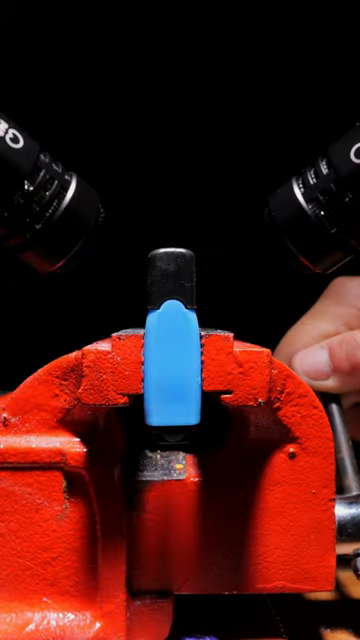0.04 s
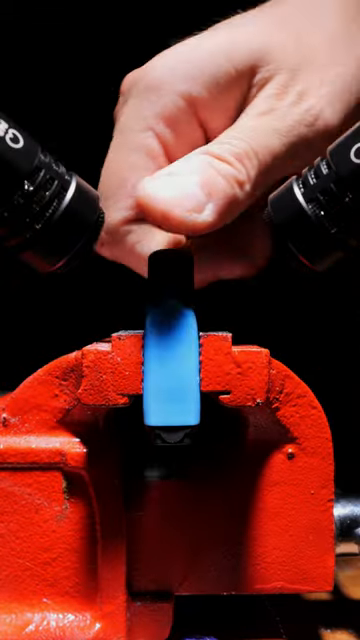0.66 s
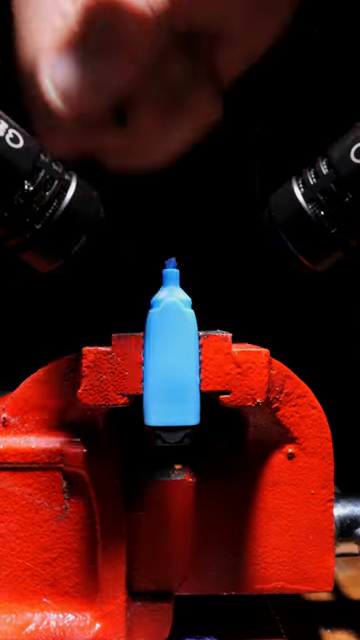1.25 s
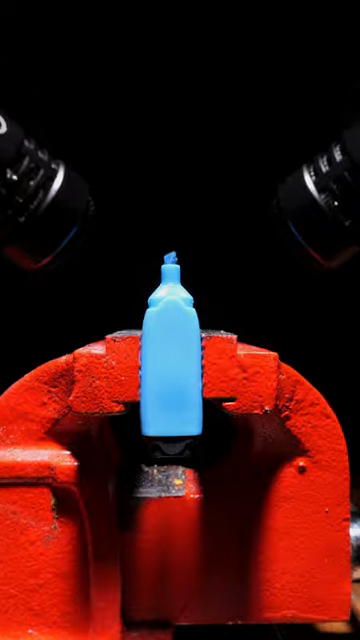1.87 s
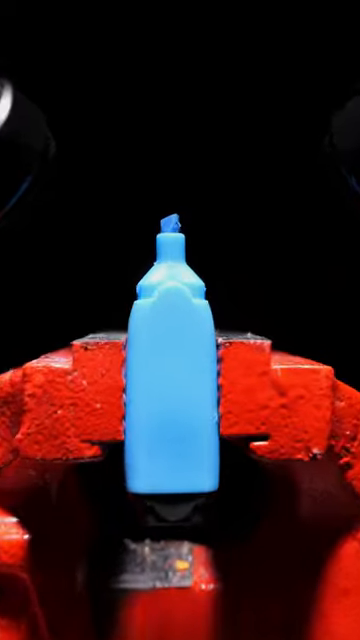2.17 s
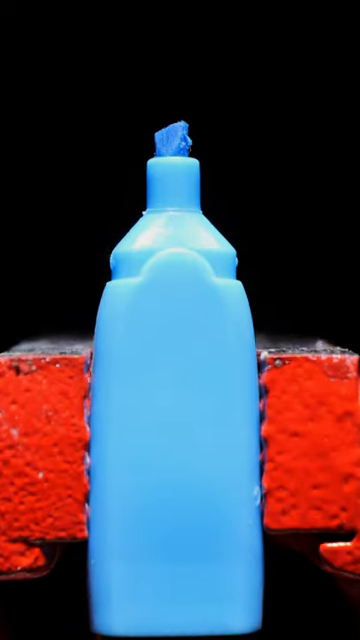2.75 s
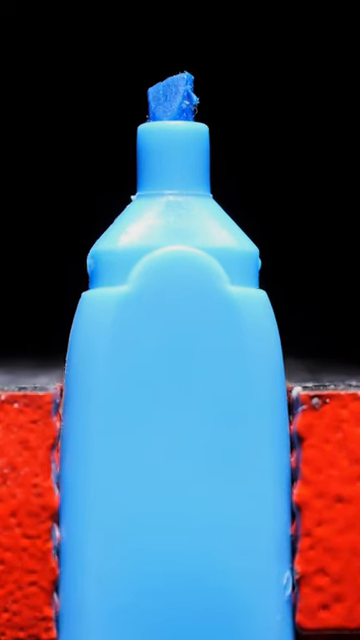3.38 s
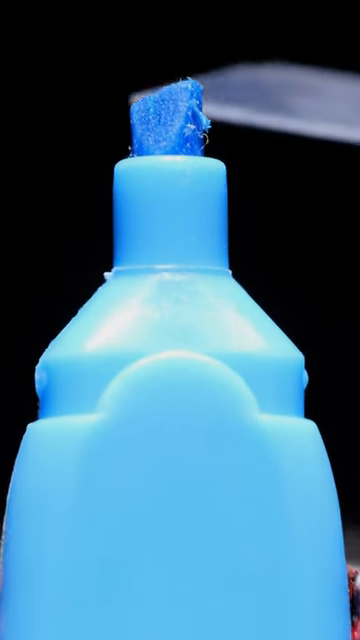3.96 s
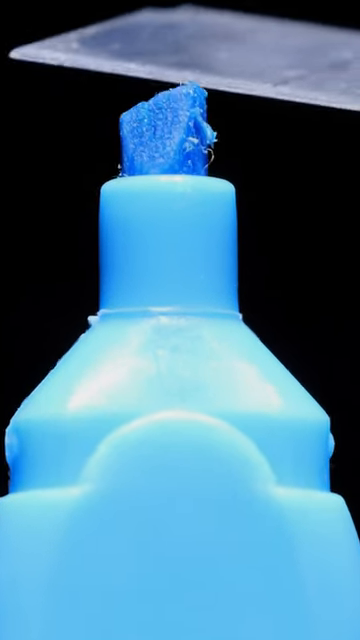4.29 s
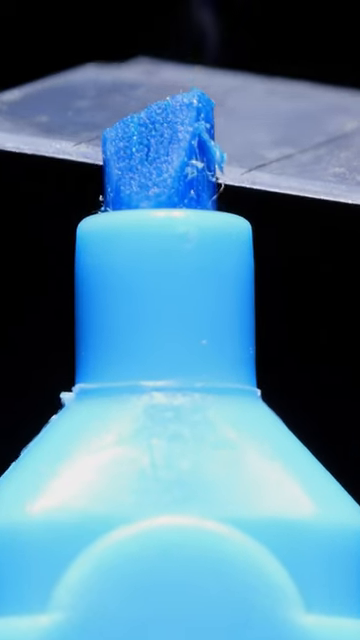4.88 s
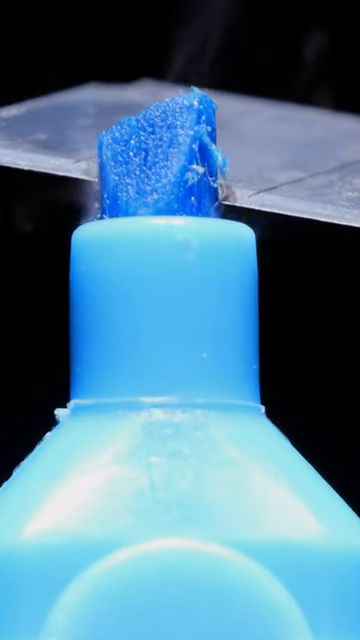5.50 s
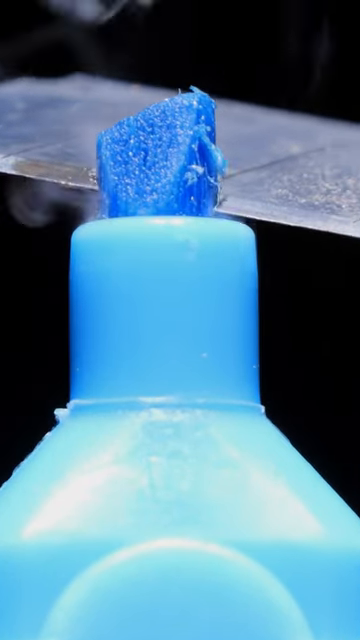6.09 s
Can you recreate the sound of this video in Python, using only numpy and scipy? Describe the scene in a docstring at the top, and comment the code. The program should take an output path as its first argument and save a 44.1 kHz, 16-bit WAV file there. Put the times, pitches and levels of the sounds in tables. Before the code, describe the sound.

Close sharp vise clicks, a plastic cap snapping off, faint bumps, a swelling hiss, then wet ink sizzling and crackling on a hot blade.

```python
"""Sharp clicks and dull knocks, very close: a bench vise tightens on a plastic highlighter.
Fingers slide on the cap, which scrapes over its ridges and snaps off, thumping the bench.
The rig rumbles and bumps as it moves in, and a rush of hiss swells as a hot blade arrives.
The blade sinks into the wet felt tip: tiny ink bubbles burst in a sizzle and larger ones spit."""
import sys
import numpy as np
from scipy import signal
from scipy.fft import rfft, irfft, next_fast_len
from scipy.io import wavfile
from scipy.ndimage import uniform_filter1d

SR = 44100
rng = np.random.default_rng(int(sys.argv[2]) if len(sys.argv) > 2 else 0)


def file_out(sig):
    """Save sig as 16-bit WAV at sys.argv[1]."""
    # one column per channel
    cols = np.atleast_2d(sig).T
    # limit, then scale
    lim = np.clip(cols, -1, 1)
    pcm = np.round(lim * 32767).astype(np.int16)
    wavfile.write(sys.argv[1], SR, pcm)


N = 270774
TIME = np.arange(N) / SR
FFT_SIZE = next_fast_len(N + SR)
BIN_HZ = np.maximum(np.arange(FFT_SIZE // 2 + 1) * SR / FFT_SIZE, 1)
REPEAT_S, RUSH_CREST_S = 0.02086, 4.0846

# clicks of the tightening vise: start_s, peak_db, lowpass_hz, t60_s
VISE_CLICKS = [(0.0209, -15.5, 9100, 0.012), (0.0307, -13.5, 4440, 0.005), (0.057, -16.5, 10300, .0045),
               (0.0636, -20, 11000, 0.0045), (0.0837, -13, 4350, 0.0088), (0.2008, -19, 5300, 0.009),
               (0.3802, -37.5, 1420, .022)]
# tone of the vise: freq_hz, gain_db
VISE_COLOUR = [(200, -16.5), (800, -18), (1300, -7.5), (2100, 2), (2800, 2.5), (4000, -1.5), (5500, -6.5),
               (7800, -12), (9800, -6), (12500, -27.5), (16000, -32)]
# faint bright ticks of the screw thread: start_s, peak_db
THREAD_TICKS = [(0.021, -28.5), (0.057, -36), (0.0635, -38), (0.1665, -53), (0.1988, -36.5),
                (0.3295, -54.5), (0.381, -43)]
# dull knocks of vise and hand: start_s, peak_db, lowpass_hz, t60_s, repeat_gain
KNOCKS = [(0.02, -40, 900, 0.046, 1), (0.0879, -36, 900, 0.013, 0.1), (0.0963, -27.5, 1192, 0.013, .75),
          (0.2012, -25.5, 1560, 0.014, 0.72), (0.2288, -32, 1010, 0.021, 0.3),
          (0.38, -32.5, 1900, 0.033, 0.7), (1.4172, -53, 450, 0.087, 0.1), (1.4385, -49.5, 720, 0.088, 0),
          (1.538, -60.5, 699, 0.04, 0.02), (2.946, -43.5, 496, 0.057, 0.1), (3.2416, -43, 950, 0.029, 0.18),
          (3.464, -54, 1210, 0.058, 0)]
# tone of a knock: freq_hz, gain_db
KNOCK_COLOUR = [(60, -19), (150, -4.5), (380, -3), (600, 3), (850, -7.5), (1400, 0), (2500, -31),
                (8000, -60.5)]
# small scuffs of hand and cap: start_s, peak_db, pitch_hz, t60_s
SCUFFS = [(0.755, -63, 1597, 0.03), (1.437, -53, 1840, 0.28), (1.54, -62, 2200, 0.087),
          (2.447, -51, 2000, 0.19), (2.447, -49, 5070, 0.13), (2.939, -54.5, 1750, 0.11)]

# pushes on the vise and the rig: centre_s, width_s, strength_db
PUSHES = [(0.9, .04, -70), (1.46, 0.086, -58), (1.71, .015, -71.5), (2.125, 0.068, -52), (2.3, .1, -56),
          (2.455, 0.073, -50), (2.81, 0.036, -58.5), (2.98, 0.057, -54), (3.19, .04, -75),
          (3.31, 0.032, -55), (4.02, 0.027, -62), (4.29, 0.024, -61), (4.65, 0.21, -69.5)]
# brief rubs of skin and gear: centre_s, width_s, level_db
RUBS = [(0.987, 0.026, -55.5), (2.46, 0.014, -57), (2.94, 0.085, -69), (3.365, 0.0096, -63),
        (3.47, 0.0082, -58.5)]
# bright tone of a rub: freq_hz, gain_db
RUB_COLOUR = [(500, -32), (1300, -15), (2200, 2), (3300, -1.5), (5000, 3.5), (7800, 3.5), (9500, 11.5),
              (12000, -3), (16000, -12)]
# sub-bass sway of the rig: freq_hz, gain_db
SWAY_COLOUR = [(8, -2), (18, 10.5), (45, -5), (70, -24), (140, -49.5)]
# low rumble: freq_hz, gain_db
RUMBLE_COLOUR = [(30, -8.5), (65, 0.5), (120, 4), (170, 1), (230, -11), (450, -15), (700, -34.5),
                 (2000, -40.5)]
# hiss of the rig and the background: freq_hz, gain_db
HISS_COLOUR = [(200, 2.5), (500, 5.5), (800, 2), (1400, 5), (2200, 5), (3300, -5), (4600, 1), (6500, -8.5),
               (8000, -7), (9800, 4.5), (12000, -4.5), (13200, -10.5), (14500, -5), (16000, -22.5)]

# the cap slipping over its ridges: start_s, peak_db, t60_s
CAP_SLIPS = [(1.2065, -29.5, 0.015), (1.2111, -21, 0.024), (1.2165, -27.5, 0.0099), (1.2186, -21.5, .008),
             (1.2228, -23.5, 0.025), (1.2358, -18.5, .006), (1.2406, -12, .009)]
# tone of a slip: freq_hz, gain_db
SLIP_COLOUR = [(300, 6.5), (1200, -8.5), (1650, -16.5), (2800, -4.5), (3600, -11), (4600, -1.5),
               (6500, -12.5), (9800, -1.5), (12500, -17), (16000, -24)]
# ringing modes of the cap: pitch_hz, level_db, t60_s
CAP_MODES = [(2060, -8.5, .009), (2480, -6.5, .008), (2782, 1, 0.0092), (3050, -8, .008), (3980, -6, .007),
             (4470, 1.5, 0.011), (4950, -7, 0.0085), (5660, -10, 0.011), (6900, -11, .005),
             (8740, -6, .005), (9500, -6, 0.004), (11950, -5, 0.0029)]
# hiss after the snap: freq_hz, gain_db
SNAP_TAIL_COLOUR = [(300, 4.5), (700, -3.5), (1200, -4), (1600, -14), (2200, -4), (2800, 2.5), (3600, -10),
                    (4600, -4), (6000, -7.5), (8000, -10), (10000, -7), (12000, -14), (14000, -32.5)]
# jolts through the bench: start_s, peak_db, lowpass_hz
BENCH_JOLTS = [(1.207, -8, 340), (1.222, -20.5, 210), (2.102, -32, 138.5), (3.2406, -18.2, 65),
               (3.29, -30, 80.8)]
# ringing modes of the bench: pitch_hz, level_db, t60_s
BENCH_MODES = [(52, -1, .1), (72, 0.5, 0.082), (101, -1, 0.068), (124, -2, .07), (182, -6, .065),
               (280, -8, .045), (375, -5, 0.012)]
# slow swings of the microphone stand after the hardest jolts: start_s, pitch_hz, peak_db, t60_s
STAND_SWINGS = [(1.249, 13.5, -10.5, 0.33), (3.272, 24.4, -23, 0.19)]

# swells of the rush's body, edge and top: rise_s, fall_s, crest_db, rise_power, fall_power
RUSH_SWELLS = [(.65, 0.94, -36, 1.44, 1.98), (0.67, .86, -35, 2, 1.6), (0.7, 0.99, -33.5, 1.87, 1.87)]
# midrange body of the rush: freq_hz, gain_db
RUSH_BODY = [(100, -36), (165, -13), (270, -5.5), (400, -21), (750, -12), (1000, -10.5), (1400, -1.5),
             (2200, 3), (2900, -1), (3600, -16.5), (6000, -34), (14000, -50)]
# biting edge of the rush: freq_hz, gain_db
RUSH_EDGE = [(1500, -31.5), (2800, -6), (3500, -1), (4300, 0.5), (5300, -2.5), (6200, -6.5), (8000, -21),
             (14000, -45)]
# airy top of the rush: freq_hz, gain_db
RUSH_TOP = [(2500, -22), (5000, -14), (7200, -3.5), (8100, -5), (9400, 2.5), (10500, -2), (12200, -7.5),
            (13200, -21), (14500, -10.5), (16000, -32)]

# envelope of the ink boiling at the blade: time_s, level_db
BOIL_ENVELOPE = [(4.7, -51.5), (4.856, -40), (5.012, -37.5), (5.208, -36.5), (5.606, -35.5), (6.03, -37.5),
                 (6.14, -38)]
# crisp tone of the sizzle, also used for the thread ticks: freq_hz, gain_db
SIZZLE_COLOUR = [(150, -47.5), (350, -30), (700, -21), (1500, -13), (2400, -9), (3400, -13), (5000, -5),
                 (6100, -10), (7300, -2.5), (8100, -4.5), (9900, 4), (12000, -3.5), (13200, -6.5),
                 (14500, -6.5), (16000, -21.5)]
# one faint tick as the blade nears, then the loud spits of boiling ink: start_s, peak_db
TICK_AND_SPITS = [(3.4642, -44), (4.8397, -15), (4.8418, -24), (5.0958, -15.5), (5.1657, -18),
                  (5.3888, -8.5), (5.4771, -14), (5.4912, -11), (5.529, -15), (5.547, -15), (5.6948, -15.5),
                  (5.7536, -11.5), (5.7613, -12), (5.7882, -14.5), (5.8815, -6.5), (6.0366, -16)]
# tone of that tick and of the spits: freq_hz, gain_db
SPIT_COLOUR = [(80, -50), (200, -32), (700, -23.5), (1500, -12.5), (2400, -10.5), (3500, -13), (5000, -7.5),
               (6100, -11), (7300, -8.5), (9900, 1.5), (12000, -7.5), (13200, -8), (16000, -14)]

# stereo width of the noise layers and the fizz: freq_hz, side_over_mid_db
STEREO_WIDTH = [(60, -30), (200, -16), (400, -10), (700, -3.5), (1300, -10.5), (2400, -53.5), (8000, -20.5),
                (15000, -71.5)]
# workshop reverb decay (the negative last point only steepens the treble slope): freq_hz, t60_s
ROOM_T60 = [(100, 0.23), (600, 0.35), (1500, 0.56), (4000, 0.74), (7000, 1), (15000, -0.17)]
# tone of the reverb: freq_hz, gain_db
ROOM_COLOUR = [(100, -5), (550, 3.5), (900, -4), (1800, -2), (3500, -3), (5000, -2), (7000, -9.5),
               (15000, -7)]
# stereo width of the reverb: freq_hz, side_over_mid_db
ROOM_WIDTH = [(100, -7.5), (380, -2), (700, 1), (1300, -2), (2400, -7.5), (4400, -9.5), (8000, -6),
              (15000, -13)]


def from_db(db):
    """Decibels to gain."""
    return 10 ** (np.asarray(db) / 20)


def unit_rms(x):
    """Scale to unit power."""
    return x / np.sqrt(np.mean(x ** 2) + 1e-20)


def at_hz(curve, hz):
    """Read a curve on a log-frequency axis."""
    freq_hz, value = np.transpose(curve)
    return np.interp(np.log(hz), np.log(freq_hz), value)


def butter(x, order, hz, kind="low"):
    """Butterworth filter, low-pass by default."""
    return signal.sosfilt(signal.butter(order, hz, kind, fs=SR, output="sos"), x)


def colour(x, spectrum):
    """Minimum-phase EQ, so attacks have no pre-ring."""
    cepstrum = irfft(np.log(from_db(at_hz(spectrum, BIN_HZ))), FFT_SIZE)
    cepstrum[1:FFT_SIZE // 2] *= 2
    cepstrum[FFT_SIZE // 2 + 1:] = 0
    return irfft(rfft(x, FFT_SIZE) * np.exp(rfft(cepstrum)), FFT_SIZE)[..., :N]


def stereo(mid, side):
    """Left and right from mid and side."""
    return np.array([mid + side, mid - side])


def noise(spectrum):
    """A steady bed of coloured noise at unit power, widest in the low mids."""
    mid, side = rfft(rng.standard_normal((2, FFT_SIZE))) * from_db(at_hz(spectrum, BIN_HZ))
    side = side * from_db(at_hz(STEREO_WIDTH, BIN_HZ))
    return unit_rms(stereo(*irfft([mid, side], FFT_SIZE)[:, :N]))


def drift(rate_hz):
    """A random wobble at unit power."""
    knots = rng.standard_normal(N // 20)
    return unit_rms(np.interp(TIME * rate_hz, np.arange(len(knots)), knots))


def held(start_s, end_s, fade_db_per_s):
    """Full gain between two times, fading away on both sides."""
    outside_s = np.maximum(start_s - TIME, 0) + np.maximum(TIME - end_s, 0)
    return from_db(-fade_db_per_s * outside_s)


def bumps(rows):
    """An envelope of bell-shaped swells."""
    return sum(from_db(db) * np.exp(-0.5 * ((TIME - centre_s) / width_s) ** 2)
               for centre_s, width_s, db in rows)


def response(spectrum):
    """The short answer of a body to one click."""
    return colour(np.ones(1), spectrum)[:SR // 10]


def crack(body, t60_s, grit):
    """A click and its dying burst of grit, heard through a body."""
    burst = grit * rng.standard_normal(len(body)) * from_db(-60 * TIME[:len(body)] / t60_s)
    burst[0] += 1
    return signal.fftconvolve(burst, body)[:len(body)]


def struck(modes, t):
    """A struck body: dying sines of alternating polarity."""
    return sum((-1) ** k * from_db(db - 60 * t / t60_s) * np.sin(2 * np.pi * hz * t)
               for k, (hz, db, t60_s) in enumerate(modes))


def place(track, start_s, sound, peak_db):
    """Drop a sound onto a track at a given peak level."""
    i = int(np.clip(round(start_s * SR), 0, N - 1))
    track[i:i + len(sound)] += (from_db(peak_db) * sound / np.abs(sound).max())[:N - i]


def repeated(x, gain):
    """A sound with one short repeat."""
    lag, out = round(REPEAT_S * SR), x.copy()
    out[..., lag:] += gain * x[..., :-lag]
    return out


def room(x, decay_scale=1.0):
    """Workshop reverb, wet only: a diffuse stereo tail that dies band by band."""
    edges_hz, t, tail = np.geomspace(60, 16000, 12), TIME[:SR], 0
    for low, high in zip(edges_hz, edges_hz[1:]):
        hz = np.sqrt(low * high)
        mid, side = butter(rng.standard_normal((2, SR)), 2, [low, high], "band")
        band = stereo(mid, from_db(at_hz(ROOM_WIDTH, hz)) * side)
        fall_db = -60 * t / (decay_scale * at_hz(ROOM_T60, hz))
        tail = tail + band * from_db(at_hz(ROOM_COLOUR, hz) + fall_db)
    fade_in = np.minimum(t / 0.0073, 1)
    return signal.fftconvolve(x[None], unit_rms(tail * fade_in) / np.sqrt(SR), axes=1)[:, :N]


def vise_clicks():
    """The screw slips in sharp steps and its thread ticks, each heard twice."""
    clicks, body, tick_body = np.zeros(N), response(VISE_COLOUR), response(SIZZLE_COLOUR)
    for start_s, peak_db, lowpass_hz, t60_s in VISE_CLICKS:
        place(clicks, start_s, butter(crack(body, t60_s, grit=0.36), 4, lowpass_hz), peak_db)
    for start_s, peak_db in THREAD_TICKS:
        place(clicks, start_s, crack(tick_body, t60_s=0.0045, grit=0.37), peak_db)
    reverb = from_db(-13.5) * room(clicks)
    # the vise still rings from the turn before
    ring = from_db(-54 - 83.5 * TIME) * (noise(VISE_COLOUR) + from_db(-0.5) * noise(KNOCK_COLOUR))
    return repeated(clicks, gain=0.73) + reverb + ring


def knocks():
    """Blunt contacts on the heavy casting and the bench."""
    hits, body = np.zeros(N), response(KNOCK_COLOUR)
    for start_s, peak_db, lowpass_hz, t60_s, repeat_gain in KNOCKS:
        knock = butter(crack(body, t60_s, grit=0.1), 2, lowpass_hz)
        place(hits, start_s, repeated(knock, repeat_gain), peak_db)
    return hits + from_db(-13) * room(hits)


def scuffs():
    """Hand and cap scrape briefly: friction noise in one broad resonance."""
    scrapes, t = np.zeros(N), TIME[:SR // 4]
    for start_s, peak_db, pitch_hz, t60_s in SCUFFS:
        friction = butter(rng.standard_normal(len(t)), 2, [pitch_hz / 1.34, pitch_hz * 1.22], "band")
        place(scrapes, start_s, friction * from_db(-60 * t / t60_s), peak_db)
    return scrapes


def rig_handling():
    """The rig rumbles, sways and hisses as it is pushed and glides in; skin and gear rub briefly."""
    push = bumps(PUSHES)
    glide = held(start_s=1.68, end_s=3.44, fade_db_per_s=110)
    handled = held(start_s=0.91, end_s=4.9, fade_db_per_s=20)
    smeared_push = uniform_filter1d(push, int(0.18 * SR))   # the deep sway spreads around each push
    sway_gain = from_db(2.5) * smeared_push + from_db(-61.5) * glide + from_db(-72) * handled
    sway = sway_gain * noise(SWAY_COLOUR)
    rumble = from_db(-1) * np.hypot(push, from_db(-72.5) * glide) * noise(RUMBLE_COLOUR)
    hiss = (from_db(-71.5) * glide + from_db(-33.5) * push) * noise(HISS_COLOUR)
    rubs = bumps(RUBS) * noise(RUB_COLOUR)
    return sway + rumble + hiss + rubs


def cap_pull(snap_s=1.2407, tail_hold_s=0.073):
    """The cap scrapes over its ridges and rings as it snaps free, trailing hiss and rumble."""
    clicks, body = np.zeros(N), response(SLIP_COLOUR)
    for start_s, peak_db, t60_s in CAP_SLIPS:
        place(clicks, start_s, crack(body, t60_s, grit=0.92), peak_db)
    place(clicks, snap_s, struck(CAP_MODES, TIME[:SR // 10]), peak_db=-5)
    sliding = held(CAP_SLIPS[0][0], CAP_SLIPS[-1][0], fade_db_per_s=1701.5)
    slide = from_db(-46.5) * sliding * noise(SLIP_COLOUR)
    reverb = from_db(-25) * room(clicks, decay_scale=0.45)
    tail_gain = from_db(-49) * (TIME > snap_s) * held(snap_s, snap_s + tail_hold_s, fade_db_per_s=254)
    tail = tail_gain * (noise(SNAP_TAIL_COLOUR) + from_db(7.5) * noise(RUMBLE_COLOUR))
    return clicks + slide + reverb + tail


def bench_thumps():
    """Jolts ring the bench's low modes; the stand swings slowly after the hardest ones."""
    thumps, t = np.zeros(N), TIME[:SR // 2]
    bench = struck(BENCH_MODES, t)
    for start_s, peak_db, lowpass_hz in BENCH_JOLTS:
        place(thumps, start_s, butter(bench, 2, lowpass_hz), peak_db)
    for start_s, pitch_hz, peak_db, t60_s in STAND_SWINGS:
        attack = 1 - np.exp(-t * pitch_hz / 0.066)
        place(thumps, start_s, struck([(pitch_hz, 0, t60_s)], t) * attack, peak_db)
    return thumps + from_db(-16) * room(thumps)


def rush_swell(rise_s, fall_s, crest_db, rise_power, fall_power):
    """An envelope that climbs to the crest of the rush and falls back to silence."""
    rise = np.clip(1 + (TIME - RUSH_CREST_S) / rise_s, 0, 1)
    fall = np.clip(1 - (TIME - RUSH_CREST_S) / fall_s, 0, 1)
    return from_db(crest_db) * rise ** rise_power * fall ** fall_power


def blade_rush(repeat_gain=0.67, surge_width_s=0.021):
    """Hiss swells over a little rumble as the blade arrives; a short repeat turns it slightly hollow."""
    body_gain, edge_gain, top_gain = [rush_swell(*row) for row in RUSH_SWELLS]
    body = body_gain * (noise(RUSH_BODY) + from_db(-34) * noise(RUMBLE_COLOUR))
    hiss = body + edge_gain * noise(RUSH_EDGE) + top_gain * noise(RUSH_TOP)
    surge_db = np.exp(-0.5 * ((TIME - RUSH_CREST_S) / surge_width_s) ** 2)   # 1 dB extra at the crest
    flutter_db = 0.6 * drift(rate_hz=150)
    return repeated(hiss * from_db(surge_db + flutter_db), repeat_gain) / np.hypot(1, repeat_gain)


def tick_and_spits(boil, max_per_s=30, over_boil_db=17, spread_db=1.5):
    """A faint tick as the blade nears; then larger bubbles crack, on cue and at random with the boil."""
    cracks, body = np.zeros(N), response(SPIT_COLOUR)
    onsets = np.flatnonzero(rng.random(N) < max_per_s * boil / boil.max() / SR)
    peaks_db = 20 * np.log10(boil[onsets]) + over_boil_db + spread_db * rng.standard_normal(N)[onsets]
    for start_s, peak_db in [*TICK_AND_SPITS, *zip(TIME[onsets], peaks_db)]:
        place(cracks, start_s, crack(body, t60_s=0.0014, grit=0.055), peak_db)
    return cracks


def bubble_pops(per_s, spread_db):
    """Random bubble bursts of uneven size, as a mid and a side click train."""
    popped = rng.random((2, N)) < per_s / SR
    polarity = rng.choice([-1, 1], (2, N))
    size_db = spread_db * np.minimum(rng.exponential(1, (2, N)), 4)
    return popped * polarity * from_db(size_db)


def ink_sizzle():
    """Thousands of tiny ink bubbles burst on the hot steel over a bed of steam; a few spit loudly."""
    time_s, level_db = np.transpose(BOIL_ENVELOPE)
    boil = from_db(np.interp(TIME, time_s, level_db)) * held(time_s[0], time_s[-1], fade_db_per_s=81)
    # each size of bubble sounds in its own band
    edges_hz = [150, 600, 1400, 2800, 5600, 10000, 17000]
    pops = sum(butter(bubble_pops(per_s=2600, spread_db=5), 2, [low, high], "band")
               for low, high in zip(edges_hz, edges_hz[1:]))
    pops += bubble_pops(per_s=700, spread_db=5.5)   # the sharpest crack across all bands
    mid, side = colour(pops, SIZZLE_COLOUR)
    fizz = unit_rms(stereo(mid, from_db(-3) * colour(side, STEREO_WIDTH)))
    steam = noise(SIZZLE_COLOUR)
    return boil * (0.8 * fizz + 0.6 * steam) + tick_and_spits(boil)


def scene():
    """The full mix over a faint bed of hiss and rumble."""
    bed = from_db(-79.5) * (noise(HISS_COLOUR) + from_db(-10.5) * noise(RUMBLE_COLOUR))
    bench_work = vise_clicks() + knocks() + scuffs() + cap_pull() + bench_thumps() + rig_handling()
    return bed + bench_work + blade_rush() + ink_sizzle()


def record(dry):
    """A steep high cut at 16.1 kHz on the whole mix."""
    return signal.sosfilt(signal.ellip(10, 0.1, 80, 16100, fs=SR, output="sos"), dry)


dry = scene()
out = record(dry)
file_out(out)
```